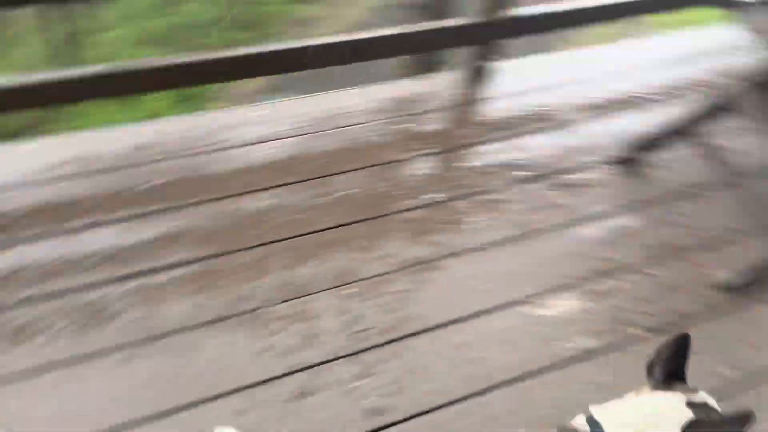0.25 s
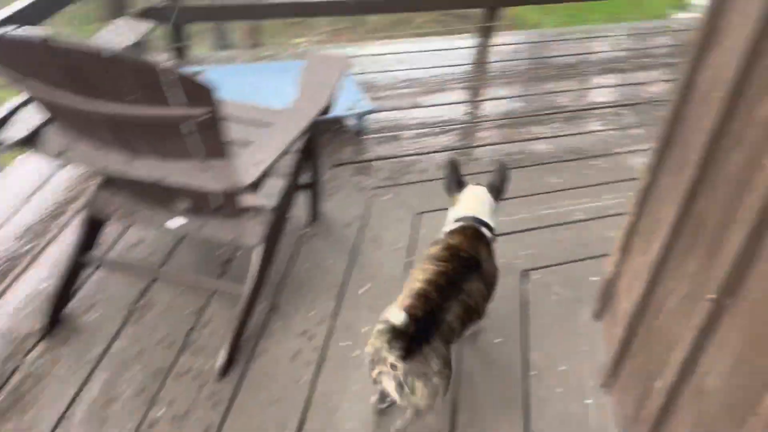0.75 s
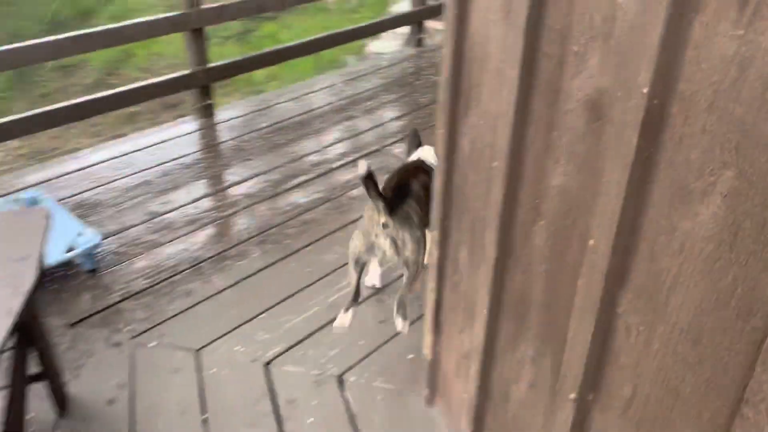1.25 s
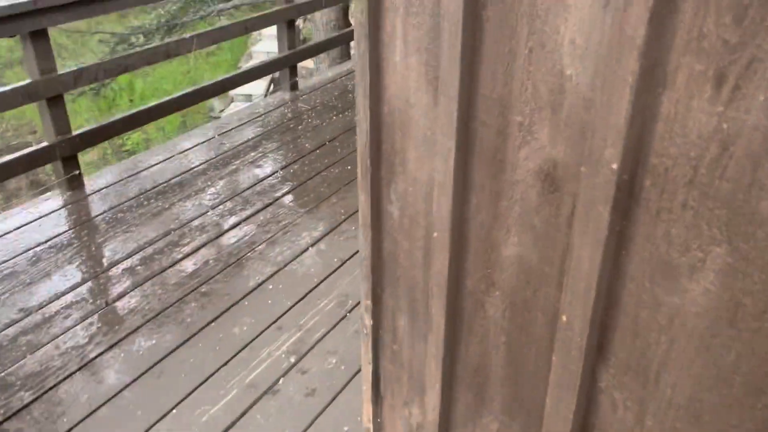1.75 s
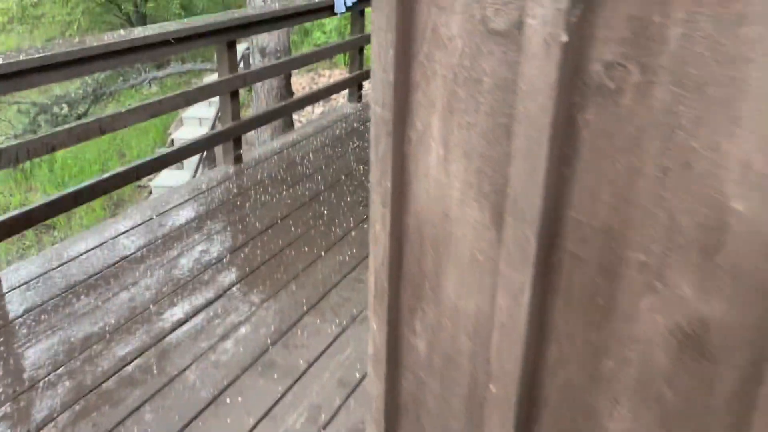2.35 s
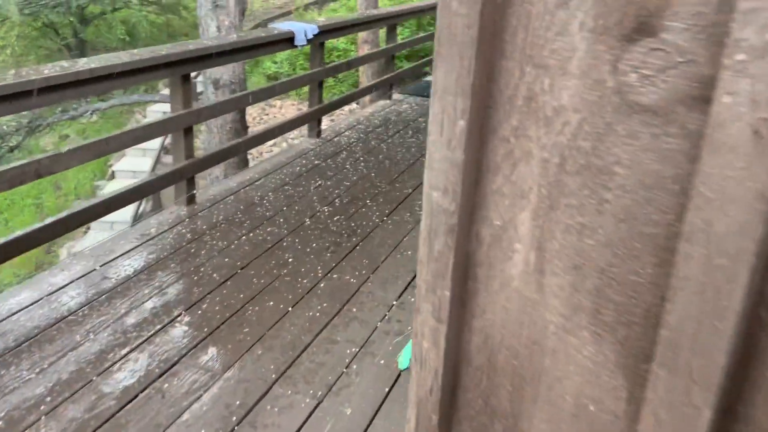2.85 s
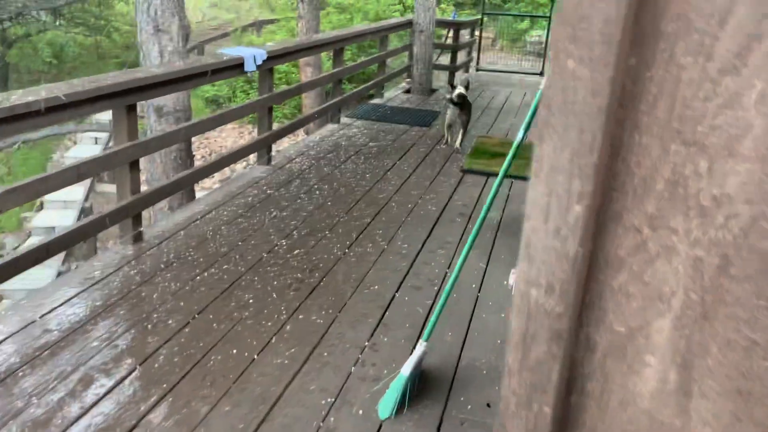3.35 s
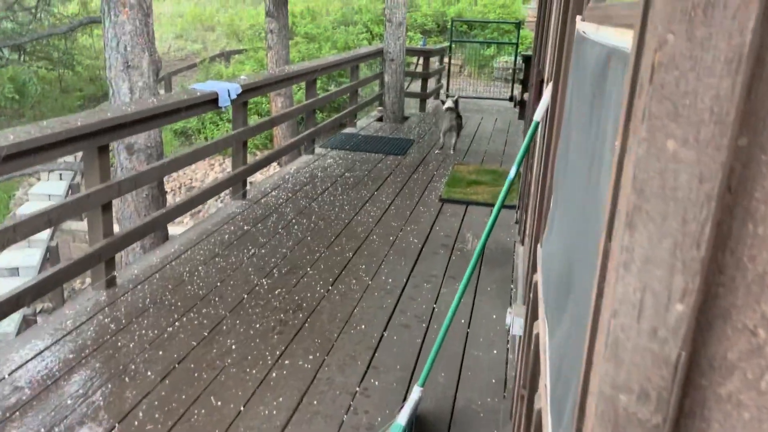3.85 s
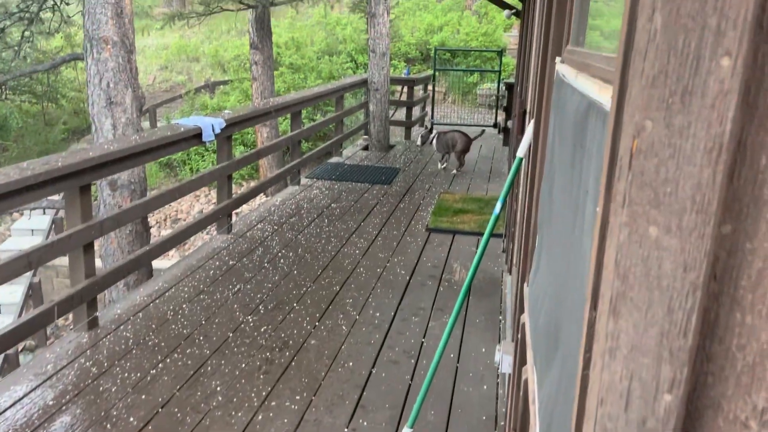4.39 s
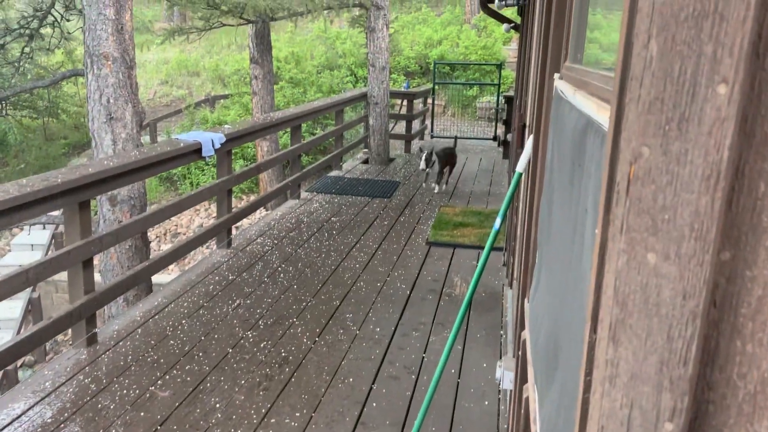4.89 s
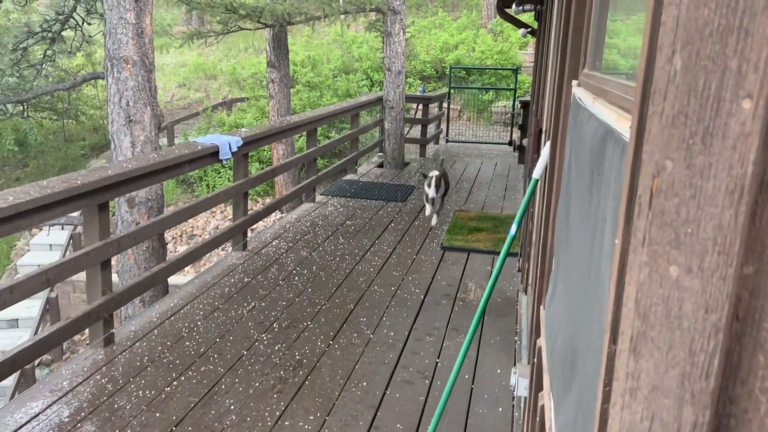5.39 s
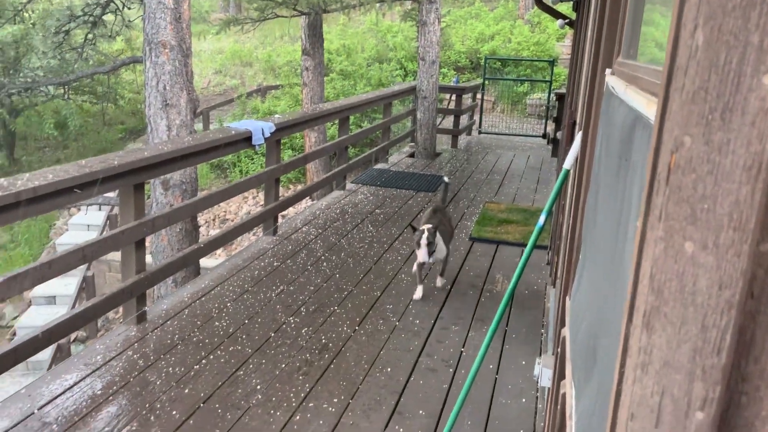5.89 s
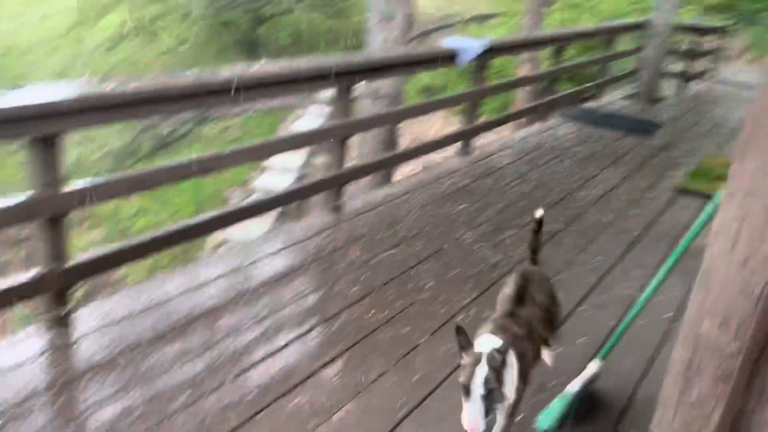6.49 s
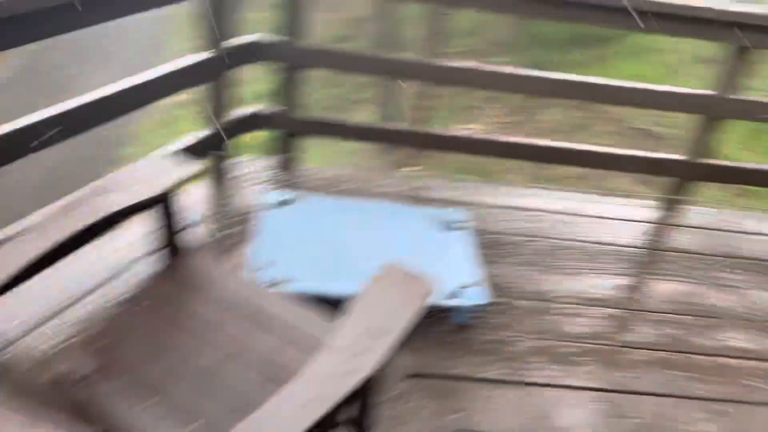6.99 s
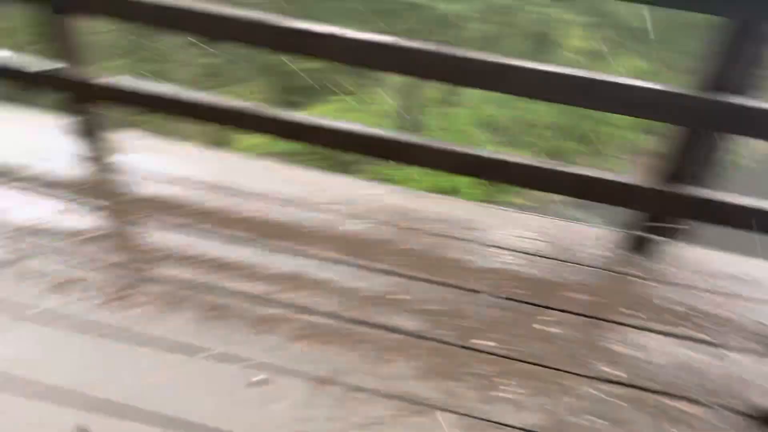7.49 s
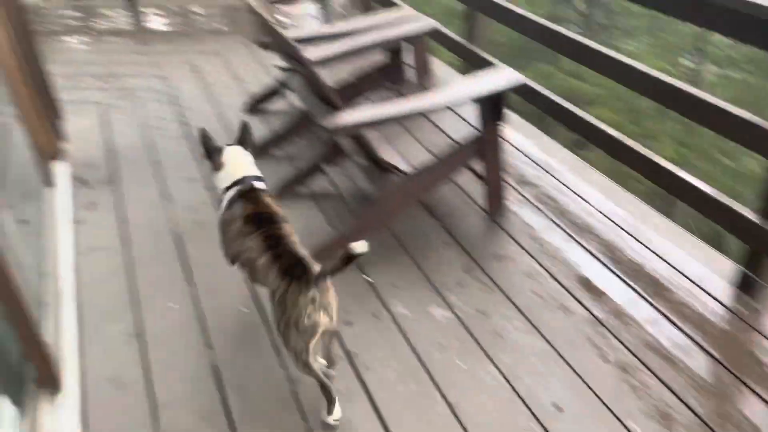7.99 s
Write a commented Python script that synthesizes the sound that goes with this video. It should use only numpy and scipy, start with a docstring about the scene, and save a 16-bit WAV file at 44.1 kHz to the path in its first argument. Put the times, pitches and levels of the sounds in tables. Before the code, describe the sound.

Close, outdoor stereo sound from under wooden eaves. At 0 s a small metal collar tag gives a quick, faint high tinkle with a soft hollow swish, over fine rain hiss and light hail patter. From about 1 s, bright icy ticks with tiny splashes stand out, and short hollow knocks sound on planks. Low gusts rumble and soft handling bumps thump, busiest around 0.8-1.6 and 2.5-3.5 s. A strong woody knock lands at 3.3 s, a pair near 3.9, and the hardest cluster with sharp clacks at 4.5. The shower stays dense and crackling from 3.5 to 6.8 s, with another firm knock at 6.4. Near hits get a very short wall reflection. After 7 s the patter thins, the tag tinkles at 7.1 and 7.6, soft swishes pass at 7.65-8, and a distant rush rises as the treble dulls until 8.2 s.

```python
"""Hail and rain on a wooden deck

Heard from under the eaves: filtered noise and thousands of random impacts make the hiss and patter.
Tabled near stones ping, clack and splash as shaped noise bursts; heavy knocks add decaying plank modes.
Gusts of low noise rumble at the microphone, with soft bumps, hollow swishes and a distant rush.
A dog's collar tag tinkles as decaying sines; the wall and eaves return a short answer to near hits."""
import sys
import numpy as np
from scipy import signal
from scipy.fft import rfft, irfft, next_fast_len
from scipy.io import wavfile
from scipy.ndimage import uniform_filter1d, map_coordinates

SR = 44100
rng = np.random.default_rng(int(sys.argv[2]) if len(sys.argv) > 2 else 0)


def dump(signal):
    """Clip the signal to [-1, 1] and save it as 16-bit WAV at the path in sys.argv[1]."""
    limited = np.clip(np.atleast_2d(signal).T, -1, 1)
    pcm = np.round(limited * 32767).astype(np.int16)
    wavfile.write(sys.argv[1], SR, pcm)


N = 363384

# distant rush level: time_s, level_db
RUSH_LEVEL = [(0, -36), (.25, -44), (1.5, -43), (6.9, -50), (7.4, -39), (7.8, -35), (8.24, -34.5)]
# gusts at the microphone: crest_s, half_length_s, rumble_db, buffet_db
GUSTS = [(0.816, .065, -50, -30.5), (0.936, 0.11, -37, -33.5), (1.523, 0.25, -45, -35.5),
         (2.677, 0.44, -37, -41.5), (2.986, 0.14, -29.5, -30), (3.33, 0.32, -33, -33.5),
         (4.74, 0.044, -34, -48), (5.21, .12, -34, -43), (5.824, 0.11, -29, -36), (6.01, .087, -32, -52),
         (6.147, .05, -32, -40), (6.746, 0.037, -35, -35), (7.244, 0.17, -34.5, -44),
         (7.95, 0.07, -43, -49)]
# hollow swishes: crest_s, half_length_s, level_db, crest_pitch_hz, half_width_hz
SWISHES = [(0.061, 0.042, -32, 1147, 22), (7.652, 0.027, -38, 1044, 110), (7.79, 0.043, -35, 1123, 130),
           (8.0, 0.037, -34, 874, 110)]
# bumps of hand and air on the camera: crest_s, level_db, pitch_hz, half_length_s
BUMPS = [(.752, -29.5, 270, 0.011), (.803, -24, 165, 0.0091), (.86, -23, 62, 0.02),
         (0.864, -26.5, 158, 0.0072), (.957, -28, 174, 0.016), (1.315, -30.5, 150, 0.018),
         (1.46, -25, 70, .014), (1.498, -23.5, 142, .014), (1.508, -24.5, 253, 0.017),
         (1.644, -23, 102, .013), (2.543, -22, 85, .014), (2.693, -25, 65, 0.025),
         (2.781, -28.5, 72, 0.023), (2.994, -20.5, 77, .014), (3.03, -27, 172, 0.019),
         (3.108, -24.5, 120, .008), (3.139, -20, 95.5, .016), (3.35, -23, 85, 0.011),
         (3.443, -16, 94, 0.0096), (3.506, -26, 80, 0.01), (4.407, -24.5, 49.5, 0.025),
         (5.203, -31, 105, 0.0062), (5.828, -28, 65, 0.02), (5.894, -30, 85, .016),
         (6.14, -19.5, 73, 0.019), (6.744, -28, 85, 0.011), (7.071, -30.5, 194, 0.028),
         (7.231, -29, 89, .035)]
# shakes of the collar tag: start_s, level_db
TAG_SHAKES = [(.012, -41), (.058, -43), (.119, -37), (.13, -34.5), (7.139, -39), (7.612, -41)]
# ringing modes of the collar tag: pitch_hz, relative_db, t60_s
TAG_MODES = [(5800, -6, .14), (6492, 0, .16), (12960, 9, 0.1), (13889, 3, .12)]
# shower strength as it moves along the house: time_s, level_db
SHOWER_LEVEL = [(0.0, -40), (0.34, -40.5), (0.75, -37), (1.4, -42), (1.67, -38), (3.46, -34.5),
                (3.67, -35.5), (4.73, -33.5), (4.91, -35), (5.78, -34.5), (6.29, -32.5), (6.45, -35),
                (6.77, -33.5), (7.87, -43), (8.24, -39)]
# treble gain of the patter, falling as the microphone turns away at the end: time_s, gain_db
TREBLE_TURN = [(7.3, 7.5), (7.8, 8), (8.24, 0)]
# near stones on wet boards: start_s, click_db, pitch_hz, clack_t60_s, splash_db
TICKS = [(0.2678, -30, 6160, .006, -31), (0.3964, -30.5, 4840, 0.0054, -34),
         (0.5138, -29.5, 4500, 0.0087, -42), (.7124, -38, 6000, .006, -29), (.7832, -31.5, 3400, .01, -44),
         (.8655, -36, 2200, .012, -42), (1.0025, -32, 5000, .007, -39), (1.0907, -34, 3200, .008, -29),
         (1.1195, -28, 5400, .008, -31.5), (1.1773, -36, 2900, .012, -43), (1.269, -22, 5600, 0.0082, -26),
         (1.294, -28, 4600, 0.011, -40), (1.5016, -28, 3820, 0.013, -32), (1.6213, -29, 5200, 0.0098, -39),
         (1.73, -27, 3200, .016, -44), (1.7797, -25.5, 5050, .014, -36), (1.845, -30.5, 5200, .008, -34),
         (1.94, -28.5, 2230, .022, -46), (2.0214, -37, 2400, .01, -33), (2.094, -35, 5000, .008, -30),
         (2.1263, -31, 5400, .007, -26), (2.2489, -24, 3140, .018, -38), (2.317, -27, 4840, 0.007, -23),
         (2.4345, -24, 5000, .008, -38), (2.5013, -24, 2780, .009, -44), (2.5712, -31, 6000, .006, -30),
         (2.6414, -28.5, 3800, .012, -36), (2.752, -38, 3000, .012, -33),
         (2.9347, -24.5, 5200, .007, -22.5), (3.2367, -26.5, 4160, .014, -29),
         (3.283, -26, 2180, .025, -50), (3.2975, -33, 2520, .016, -27), (3.526, -26, 4770, 0.013, -22),
         (3.587, -31, 5000, .008, -28), (3.739, -24.5, 5030, .008, -27), (3.7487, -17, 6450, 0.013, -28),
         (3.8113, -29, 2420, 0.011, -45), (3.825, -31, 4600, .008, -40), (3.851, -31, 2350, .012, -45),
         (4.009, -34, 3180, .011, -26), (4.066, -40, 6000, .006, -25), (4.132, -32.5, 5900, .006, -22),
         (4.1525, -29, 3220, .01, -39), (4.1947, -24, 4630, .011, -23), (4.2188, -37, 5500, .007, -32),
         (4.283, -24, 4940, .011, -27), (4.3188, -31, 2480, .015, -44.5), (4.392, -44, 4900, .007, -28),
         (4.4628, -28, 5700, .011, -19), (4.4694, -22, 3930, .011, -21), (4.534, -26, 2720, 0.016, -22.5),
         (4.541, -19.5, 4170, 0.0071, -32), (4.5444, -19, 3300, .012, -32), (4.549, -22, 4830, .014, -15),
         (4.6164, -33.5, 6800, .006, -25), (4.6393, -26.5, 6600, .007, -22),
         (4.6725, -24.5, 4940, 0.011, -24), (4.7564, -28, 4700, .008, -38),
         (4.7986, -36.5, 6000, .007, -24), (4.8263, -29.5, 4470, .005, -24),
         (4.8975, -24.5, 3020, 0.019, -31), (4.9655, -31, 5800, .009, -33),
         (4.9764, -26.5, 6000, .008, -27), (5.094, -26, 6800, 0.0079, -27), (5.14, -21.5, 3300, .015, -45),
         (5.271, -26.5, 4760, .008, -38), (5.3255, -27.5, 4830, .009, -27.5),
         (5.3497, -27, 3540, .013, -25), (5.358, -23.5, 4460, 0.011, -23), (5.436, -45, 3500, .01, -32),
         (5.463, -26, 3880, .014, -20), (5.5614, -29, 3730, 0.013, -49), (5.6437, -21, 4800, 0.014, -19),
         (5.684, -30, 3300, .011, -42), (5.7346, -26, 4340, .009, -24), (5.7738, -28, 4360, 0.0098, -45),
         (5.7973, -38, 6000, .006, -26), (5.881, -23.5, 2960, 0.016, -48), (5.9345, -30, 6000, .006, -26),
         (6.0233, -31, 6000, .006, -23), (6.0837, -32, 5500, .008, -28), (6.093, -25, 5200, .009, -32),
         (6.1181, -26, 4830, .008, -40), (6.1556, -26, 3540, .013, -19), (6.1875, -27, 5830, .008, -26),
         (6.262, -36.5, 4400, .009, -38), (6.2917, -30, 2800, .022, -42), (6.362, -26, 5140, .008, -27),
         (6.404, -24, 4140, .012, -25), (6.4524, -26, 3680, .01, -20), (6.647, -34, 4260, .009, -22),
         (6.694, -28, 5000, .009, -28), (6.7292, -28, 6000, .007, -31), (6.8325, -27, 3300, 0.027, -40),
         (6.8902, -37.5, 4300, .012, -28), (6.927, -30, 5200, .01, -25), (7.1487, -31.5, 4800, .008, -40),
         (7.1822, -39, 6000, .006, -25), (7.2157, -29, 4800, .014, -25), (7.263, -22, 6260, 0.006, -26),
         (7.4411, -30, 4840, .008, -38), (7.4481, -36, 2600, .014, -28), (7.6056, -29.5, 4330, .009, -47),
         (7.766, -35, 2400, 0.018, -37), (8.005, -25.5, 4530, 0.014, -45)]
# click gain in the common and separate parts of the field: gain_db
CLICK_SHARES_DB = [2.5, -1]
# heavy knocks on planks: touch_s, blow_db, pitch_hz, ring_t60_s, crack_db, joists_db
KNOCKS = [(.2135, -25, 650, 0.013, -38, -42), (.5595, -26, 700, 0.0082, -34, -42),
          (.887, -20.5, 780, 0.015, -41, -40), (1.842, -29, 685, 0.032, -44, -46),
          (1.939, -26, 1020, 0.017, -29, -40), (2.1197, -22, 720, 0.011, -38, -40),
          (2.2484, -19, 604, 0.014, -38, -42), (2.355, -23.5, 530, 0.025, -29, -24),
          (2.5, -22, 990, 0.014, -34, -38), (2.597, -20.5, 650, .014, -35, -37),
          (3.0085, -21, 660, 0.011, -34, -25), (3.274, -7, 724, 0.0079, -32.5, -21.5),
          (3.294, -24, 740, .016, -25, -23), (3.483, -20, 785, .012, -28, -36),
          (3.525, -20, 720, 0.011, -31, -33), (3.922, -13, 653, 0.012, -21, -27),
          (3.933, -12, 560, 0.018, -23, -29), (4.017, -19, 686, 0.017, -30, -28),
          (4.4775, -19, 690, .014, -29, -28), (4.5355, -8, 1020, 0.0075, -26, -21),
          (4.5427, -6.5, 715, 0.022, -24, -20), (4.706, -16, 660, 0.011, -29, -27),
          (4.827, -21, 630, 0.022, -28, -37), (5.188, -15.5, 630, 0.011, -28, -23),
          (5.348, -22, 700, .016, -27, -18.5), (5.54, -23.5, 700, 0.018, -30, -36),
          (5.558, -18, 750, 0.019, -26, -25), (5.639, -27, 950, .016, -21, -35),
          (5.8525, -20, 637, .014, -39, -34), (5.883, -15, 606, 0.015, -24.5, -18),
          (5.893, -26, 650, .016, -30, -30), (5.929, -23, 730, 0.021, -26, -29),
          (6.065, -17, 607, 0.0097, -30, -31), (6.291, -20, 616, 0.026, -23.5, -27),
          (6.431, -11.5, 770, 0.014, -23, -35), (6.663, -19, 665, 0.01, -34, -36),
          (6.839, -17.5, 693, 0.028, -33, -29), (6.9455, -22, 900, .018, -28, -36),
          (7.12, -17.5, 670, 0.019, -37, -26), (7.215, -27, 1740, 0.028, -47, -50),
          (7.438, -24, 574, 0.02, -33, -41)]
# higher plank modes: pitch_ratio, relative_db, t60_ratio
OVERTONES = [(1.72, -16, .8), (2.35, -13.5, 0.75), (3.0, -19, .6), (4.3, -17, .5)]

# air rumble spectrum: freq_hz, relative_db
RUMBLE_SPECTRUM = [(15, -38), (28, -17), (40, -6.5), (62, 3), (85, -2), (115, -7.5), (170, -24), (400, -69)]
# air buffeting spectrum: freq_hz, relative_db
BUFFET_SPECTRUM = [(50, -24), (105, 0.5), (145, 0.5), (200, -2.5), (280, -5), (450, -16), (1200, -44)]
# distant rush spectrum: freq_hz, relative_db
RUSH_SPECTRUM = [(200, -8), (400, -1), (700, -2.5), (970, 3), (1250, -1.5), (1700, -3), (2300, -10.5),
                 (4000, -28)]
# merged far rain spectrum: freq_hz, relative_db
HISS_SPECTRUM = [(150, -15), (400, 6), (1100, 4), (1800, -0.5), (3000, 2), (5000, 1.5), (7200, -3.5),
                 (9000, -8), (12000, -7), (13500, -8), (16000, -22)]
# ice impact spectrum: freq_hz, relative_db
ICE_SPECTRUM = [(200, -9), (900, -7.5), (2000, -0.5), (3500, -5), (7000, -1.5), (9000, 6), (13000, -3.5),
                (16000, -2.5)]
# wooden boards spectrum: freq_hz, relative_db
WOOD_SPECTRUM = [(100, -15.5), (250, -6.5), (420, -2.5), (550, 0.5), (720, 0), (880, -6), (1200, -2),
                 (1700, -7.5), (3000, -8.5), (8000, -32)]
# struck plank spectrum: freq_hz, relative_db
PLANK_SPECTRUM = [(100, -20), (300, -4.5), (550, 3.5), (720, 7), (880, 0.5), (1250, 5.5), (1800, -3.5),
                  (3000, -3.5), (6000, 2), (12000, -1.5)]

# decay of the porch answer: freq_hz, t60_s
PORCH_DECAY = [(200, 0.26), (1000, 0.082), (4000, 0.13), (14000, 0.1)]
# likeness of the two microphone ports, clipped to 0...0.99 in use: freq_hz, likeness
PORT_LIKENESS = [(100, 0.9), (300, 0.53), (750, 0.56), (1600, -0.3), (2500, 0.54), (5000, 0), (7000, 0.3),
                 (8000, 1.25), (9200, 1.1), (10500, 0.5), (11800, 0.9), (12100, .99)]
# phase lead of the left port: freq_hz, lead_rad
PORT_LEAD = [(100, 0), (500, .45), (900, 1.2), (1300, 1.1), (2000, -.5), (3100, 1), (4400, .4), (5200, .9),
             (6200, -.9), (7100, -1.8), (7800, -3), (9500, -3.3), (11200, -4.6), (12400, -6.25)]
# level tilt between the ports: freq_hz, left_minus_right_db
PORT_TILT = [(60, -3), (130, -5.5), (300, -2), (550, 0), (1300, -.3), (2300, 0), (3000, 2), (5000, 2),
             (8000, 0), (15000, 0)]
# narrow treble dip of the microphone: freq_hz, gain_db
MIC_COLOUR = [(5300, .5), (5450, -1.5), (5650, -5), (5800, 0)]

CALM_RUMBLE_DB, CALM_BUFFET_DB = -39, -40  # between gusts
LUMP_DB, LUMPS_PER_S = 1.5, 16  # uneven gust strength
SWISH_SAG_HZ_PER_S = 680
# layer level at the reference shower strength; growth in dB per dB of shower
SHOWER_REF_DB = -36
PATTER_DB, PATTER_GROWTH = -34.9, 0.9
SIZZLE_DB, SIZZLE_GROWTH = -35.5, 1.04  # before the treble turn gain
DRUM_DB, DRUM_GROWTH = -36.5, 1
PELLET_LOW_HZ, PELLET_HIGH_HZ = 1100, 7300
PELLET_MEAN_CYCLES, PELLET_SPREAD_DB = 28, 11  # mean cycles to fall 60 dB
BURST_S = .005  # energy reference for impacts
TICK_DELAY_S = .0005
PING_DB, PING_T60_S = -7, .016
SPLASH_HZ, SPLASH_T60_S = 13600, 0.017
CHIPS_DB, CHIPS_T60_S, CHIPS_RISE_S = -13, .038, .003
BLOW_DELAY_S, JOIST_DELAY_S = 0.001236, .007  # touch to blow, blow to joists
FLEX_DB, FLEX_RISE_S = 6, .0014
RING_DB = -17
PORCH_DB = -6.5
CEILING = .85
TOP_HZ = 15900


def amp(db):
    """Decibels to gain."""
    return 10 ** (np.asarray(db) / 20)


def unit(x):
    """Scale to rms 1."""
    return x / np.sqrt(np.mean(x ** 2) + 1e-20)


def along(points, hz):
    """Read (Hz, value) points on a log-frequency axis."""
    freq_hz, value = np.transpose(points)
    return np.interp(np.log(hz + 1), np.log(freq_hz + 1), value)


def curve(points):
    """Read (s, value) points at every sample."""
    time_s, value = np.transpose(points)
    return np.interp(np.arange(N) / SR, time_s, value)


def wobble(knots_per_s):
    """Smooth random curve through normally distributed knots."""
    knots = rng.standard_normal(int(N * knots_per_s / SR) + 4)
    return map_coordinates(knots, [np.arange(N) * knots_per_s / SR])


def swell(crest_s, half_s):
    """Gaussian rise and fall of height 1; 1/e at half_s from the crest."""
    return np.exp(-((np.arange(N) / SR - crest_s) / half_s) ** 2)


def filtered(x, response):
    """Multiply the spectrum of x by a function of frequency."""
    size = next_fast_len(N + SR // 4)
    hz = np.fft.rfftfreq(size, 1 / SR)
    return irfft(rfft(x, size) * response(hz), size)[..., :N]


def noise(spectrum):
    """Two unrelated coloured noises, joint rms 1."""
    white = rng.standard_normal((2, N))
    return unit(filtered(white, lambda hz: amp(along(spectrum, hz))))


def patchy(x, depth_db):
    """Clumped drops: brief random patches of gain over time and frequency, rms 1."""
    z = signal.stft(x, nperseg=256)[2]
    field = rng.standard_normal(z.shape[1:])
    field = uniform_filter1d(field, size=12, axis=0)
    field = uniform_filter1d(field, size=6, axis=1)
    patched = signal.istft(z * amp(depth_db * unit(field)), nperseg=256)[1]
    return unit(patched[:, :N])


def placed(times_s, sounds):
    """Sum short sounds (events, 2, samples) at their times."""
    start = (np.maximum(times_s, 0) * SR).astype(int)
    at = start[:, None] + np.arange(sounds.shape[-1])
    return np.array([np.bincount(at.ravel(), sounds[:, part].ravel(), N)[:N] for part in range(2)])


def impacts(pitch_hz, material, octaves, t60_s, rattle_db, rattle_t60_s, rattle_rise_s, size):
    """Noise bursts around each pitch: sharp contact, then a rattle that swells and dies."""
    t, hz = np.arange(size) / SR, np.fft.rfftfreq(size, 1 / SR)
    contact = amp(-60 * t / t60_s)
    rattle = amp(rattle_db - 60 * t / rattle_t60_s) * (1 - np.exp(-(t / rattle_rise_s) ** 2))
    burst = rng.standard_normal((len(pitch_hz), 2, size)) * (contact + rattle)
    distance = np.log2((hz + 1) / pitch_hz[:, None]) / octaves
    gain = amp(along(material, hz)) / (1 + distance ** 2)
    # minimum phase: no ringing before contact
    cepstrum = irfft(np.log(gain + 1e-6), size)
    fold = np.r_[1, np.full(size // 2 - 1, 2), np.zeros(size // 2)]
    causal = np.exp(rfft(cepstrum * fold))
    rung = irfft(rfft(burst) * causal[:, None], size)
    # energy of rms 1 over BURST_S
    return rung * np.sqrt(BURST_S * SR / np.sum(rung ** 2, axis=2, keepdims=True))


def fall(count, pitch_hz, scatter, spread_db):
    """Random impact times and log-normal pitches; strengths mostly weak, a few much louder."""
    when, near = rng.random((count, 2)).T
    pitches_hz = pitch_hz * np.exp(scatter * rng.standard_normal(count))
    strength = amp(spread_db * near ** 2)[:, None, None]
    return when * N / SR, pitches_hz, strength


def shower_level(db, growth):
    """Layer level in dB, following the shower strength."""
    return db + growth * (curve(SHOWER_LEVEL) - SHOWER_REF_DB)


def air():
    """Low noise swells with gusts, power-summed over a calm floor, plus the distant rush."""
    rumble, buffet = amp(CALM_RUMBLE_DB), amp(CALM_BUFFET_DB)
    lumps = amp(LUMP_DB * wobble(LUMPS_PER_S))
    for crest_s, half_s, rumble_db, buffet_db in GUSTS:
        gust = swell(crest_s, half_s) * lumps
        rumble = np.hypot(rumble, amp(rumble_db) * gust)
        buffet = np.hypot(buffet, amp(buffet_db) * gust)
    rush = amp(curve(RUSH_LEVEL)) * noise(RUSH_SPECTRUM)
    return rumble * noise(RUMBLE_SPECTRUM) + buffet * noise(BUFFET_SPECTRUM) + rush


def swishes():
    """Slow noise on a falling carrier: narrow bands that swell, sag in pitch and fade."""
    t = np.arange(N) / SR
    total = np.zeros((2, N))
    for crest_s, half_s, db, pitch_hz, width_hz in SWISHES:
        white = rng.standard_normal((2, N))
        slow = filtered(white, lambda hz: 1 / (1 + (hz / width_hz) ** 2))
        falling_hz = pitch_hz - SWISH_SAG_HZ_PER_S * (t - crest_s)
        band = unit(slow * np.sin(2 * np.pi * np.cumsum(falling_hz) / SR))
        total += amp(db) * swell(crest_s, half_s) * band
    return total


def bumps():
    """Soft low pushes: sines under short swells, in the common part only."""
    t = np.arange(N) / SR
    push = np.zeros(N)
    for crest_s, db, pitch_hz, half_s in BUMPS:
        push += amp(db) * swell(crest_s, half_s) * np.sin(2 * np.pi * pitch_hz * (t - crest_s))
    return push * np.array([[1], [0]])


def collar_tag():
    """Small metal disc: decaying sine modes, with random strengths at each shake."""
    t = np.arange(SR // 4) / SR
    hz, mode_db, t60_s = np.transpose(TAG_MODES)[:, :, None]
    modes = amp(mode_db - 60 * t / t60_s) * np.sin(2 * np.pi * hz * t)
    start_s, shake_db = np.transpose(TAG_SHAKES)
    scatter_db = rng.normal(0, 2.2, (len(start_s), 2, len(TAG_MODES)))
    return placed(start_s, amp(shake_db[:, None, None] + scatter_db) @ modes)


def pellets(count, size):
    """Small pellets all over the deck: each a decaying sine at its own pitch, rms 1."""
    when, place, near, life, side = rng.random((count, 5)).T[:, :, None]
    t = np.arange(size) / SR
    hz = PELLET_LOW_HZ + (PELLET_HIGH_HZ - PELLET_LOW_HZ) * place
    t60_s = PELLET_MEAN_CYCLES * (.5 + life) / hz
    decay = amp(PELLET_SPREAD_DB * near ** 2 - 60 * t / t60_s)
    ring = decay * np.sin(2 * np.pi * hz * t) / np.sqrt(t60_s)
    shares = np.stack([np.cos(np.pi * side), np.sin(np.pi * side)], axis=1)  # common, separate
    return unit(placed(when[:, 0] * N / SR, shares * ring[:, None]))


def patter():
    """Far rain as clumped hiss, under crackling sleet, skittering hail and pitched pellets."""
    unevenness_db = 2.13 * wobble(13) + 1.4 * wobble(110)
    hiss = amp(unevenness_db) * patchy(noise(HISS_SPECTRUM), depth_db=2.5)
    start_s, hz, strength = fall(count=7000, pitch_hz=5860, scatter=0.76, spread_db=18.0)
    grains = impacts(hz, ICE_SPECTRUM, octaves=0.41, t60_s=0.0019, rattle_db=-12,
                     rattle_t60_s=0.0081, rattle_rise_s=0.0011, size=256)
    sleet = unit(placed(start_s, strength * grains))
    start_s, hz, strength = fall(count=950, pitch_hz=5150, scatter=0.58, spread_db=14)
    stones = impacts(hz, ICE_SPECTRUM, octaves=.48, t60_s=.005, rattle_db=-16,
                     rattle_t60_s=0.19, rattle_rise_s=0.00088, size=1024)
    hail = unit(placed(start_s, strength * stones))
    shower = hiss + amp(-11.5) * sleet + amp(-8.5) * hail + amp(-6.5) * pellets(count=4400, size=1024)
    # split around 8 kHz
    sizzle = filtered(shower, lambda hz: 1 - 1 / (1 + (hz / 8000) ** 6))
    body = shower - sizzle
    sizzle_db = shower_level(SIZZLE_DB, SIZZLE_GROWTH) + curve(TREBLE_TURN)
    return amp(shower_level(PATTER_DB, PATTER_GROWTH)) * body + amp(sizzle_db) * sizzle


def drumming():
    """Boards under the shower: a wood-coloured noise murmur and random hollow taps."""
    start_s, hz, strength = fall(count=600, pitch_hz=862, scatter=0.49, spread_db=9)
    knocks_on_wood = impacts(hz, WOOD_SPECTRUM, octaves=0.48, t60_s=.006, rattle_db=-14,
                             rattle_t60_s=0.15, rattle_rise_s=0.0016, size=2048)
    taps = unit(placed(start_s, strength * knocks_on_wood))
    murmur = noise(WOOD_SPECTRUM)
    return amp(shower_level(DRUM_DB, DRUM_GROWTH)) * (amp(-3.5) * murmur + amp(-2.0) * taps)


def near_ticks():
    """Near stones: a broad clack, a narrow ping and a high splash, each with scattered chips."""
    start_s, click_db, hz, clack_t60_s, splash_db = np.transpose(TICKS)
    chips = dict(rattle_db=CHIPS_DB, rattle_t60_s=CHIPS_T60_S, rattle_rise_s=CHIPS_RISE_S, size=2048)
    clack = impacts(hz, ICE_SPECTRUM, octaves=0.98, t60_s=clack_t60_s[:, None, None], **chips)
    ping = impacts(hz, ICE_SPECTRUM, octaves=0.096, t60_s=PING_T60_S, **chips)
    splash_hz = np.full(len(start_s), SPLASH_HZ)
    splash = impacts(splash_hz, ICE_SPECTRUM, octaves=0.64, t60_s=SPLASH_T60_S, **chips)
    click_gain = amp(click_db)[:, None, None] * amp(CLICK_SHARES_DB)[:, None]
    click = click_gain * (clack + amp(PING_DB) * ping)
    return placed(start_s + TICK_DELAY_S, click + amp(splash_db)[:, None, None] * splash)


def knocks():
    """Blows on planks: thud, flexing modes, noisy ring and crack, then the joists' answer."""
    touch_s, blow_db, hz, ring_t60_s, crack_db, joists_db = np.transpose(KNOCKS)
    blow_s, t = touch_s + BLOW_DELAY_S, np.arange(4096) / SR
    blow_gain, crack_gain, joists_gain = amp([blow_db, crack_db, joists_db])[:, :, None, None]
    phase = 2 * np.pi * t * hz[:, None, None]
    ring_t60_s = ring_t60_s[:, None, None]
    thud = amp(-4 - 60 * t / 0.0092) * np.sin(1.26 * phase)
    flex = amp(FLEX_DB - 60 * t / ring_t60_s) * (1 - np.exp(-t / FLEX_RISE_S)) * np.sin(phase)
    overtones = 0
    for pitch_ratio, mode_db, t60_ratio in OVERTONES:
        scattered_db = mode_db + rng.normal(0, 2.2, (len(blow_s), 1, 1))
        decay = amp(scattered_db - 60 * t / (t60_ratio * ring_t60_s))
        overtones = overtones + decay * np.sin(pitch_ratio * phase)
    push = (thud + flex + overtones) * np.array([[1], [0]])  # common part only
    crack = impacts(hz * 1.8, PLANK_SPECTRUM, octaves=1.0, t60_s=0.016, rattle_db=-10,
                    rattle_t60_s=0.033, rattle_rise_s=0.003, size=4096)
    ring = impacts(hz, PLANK_SPECTRUM, octaves=.4, t60_s=0.04, rattle_db=-10,
                   rattle_t60_s=0.065, rattle_rise_s=0.0045, size=4096)
    joists = impacts(hz * 1.42, PLANK_SPECTRUM, octaves=1.9, t60_s=0.016, rattle_db=-2.5,
                     rattle_t60_s=0.084, rattle_rise_s=0.0076, size=4096)
    blow = blow_gain * (push + amp(RING_DB) * ring) + crack_gain * crack
    return placed(blow_s, blow) + placed(blow_s + JOIST_DELAY_S, joists_gain * joists)


def porch(x):
    """Wall and eaves: convolution with 5 ms delayed noise decaying at a rate set by frequency."""
    hz, t, z = signal.stft(rng.standard_normal((2, SR // 4)), SR, nperseg=256)
    decay = amp(-60 * t / along(PORCH_DECAY, hz)[:, None])
    tail = signal.istft(z * decay, SR, nperseg=256)[1]
    tail = np.pad(tail / np.linalg.norm(tail[0]), ((0, 0), (SR // 200, 0)))
    return signal.fftconvolve(x, tail, axes=1)[:, :N]


def ports(pair):
    """Common and separate parts to two spaced ports, with phase and level differences."""
    def shares(hz):
        angle = np.arccos(np.clip(along(PORT_LIKENESS, hz), 0, .99)) / 2
        return np.array([np.cos(angle), np.sin(angle)])

    half = np.array([[.5], [-.5]])  # left, right

    def difference(hz):
        return amp(half * along(PORT_TILT, hz)) * np.exp(1j * half * along(PORT_LEAD, hz))

    common, apart = filtered(pair, shares)
    return filtered(np.array([common + apart, common - apart]), difference)


def scene():
    """Sum air, shower and hits; only the hits feed the porch answer."""
    background = air() + swishes() + bumps()
    shower = patter() + drumming()
    hits = collar_tag() + near_ticks() + knocks()
    return ports(background + shower + hits + amp(PORCH_DB) * porch(hits))


def record(dry):
    """Narrow treble dip, soft rounding of the highest peaks, then a sharp cut at TOP_HZ."""
    heard = filtered(dry, lambda hz: amp(along(MIC_COLOUR, hz)))
    rounded = heard / (1 + (heard / CEILING) ** 6) ** (1 / 6)
    return filtered(rounded, lambda hz: hz < TOP_HZ)


dry = scene()
out = record(dry)
dump(out)
```